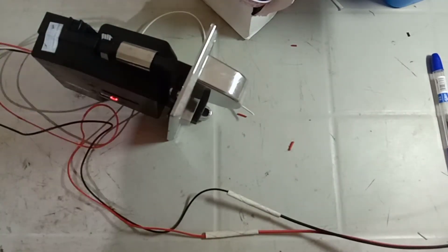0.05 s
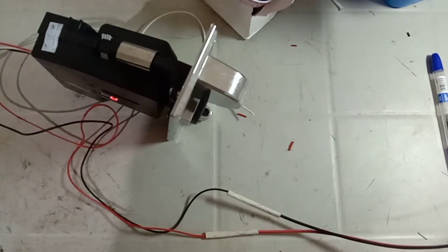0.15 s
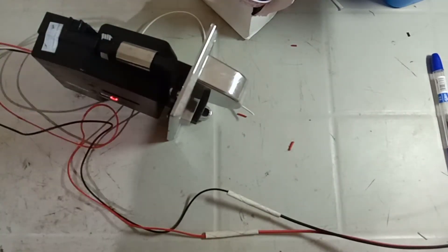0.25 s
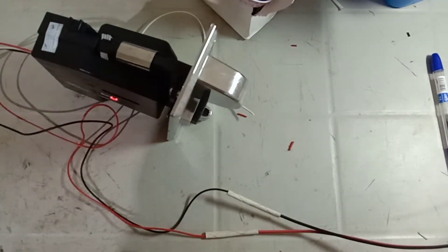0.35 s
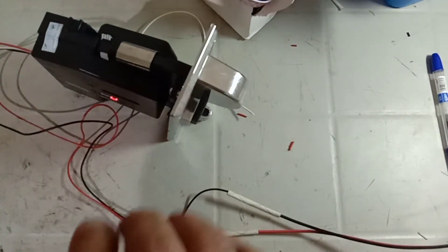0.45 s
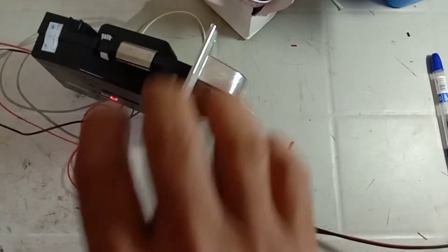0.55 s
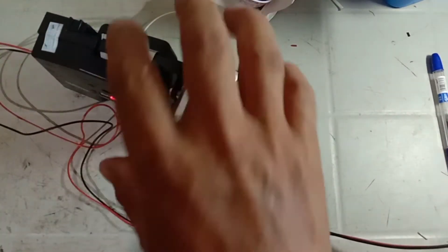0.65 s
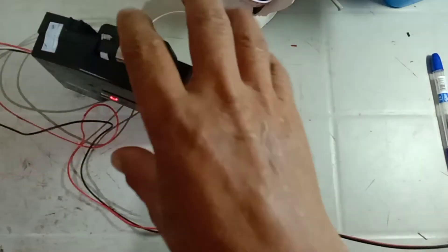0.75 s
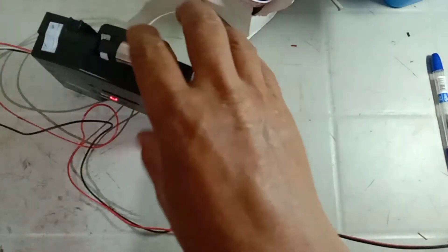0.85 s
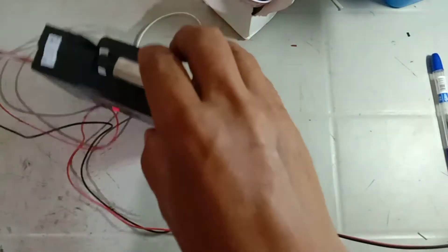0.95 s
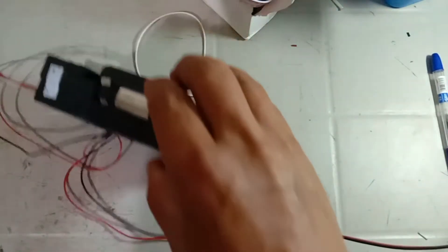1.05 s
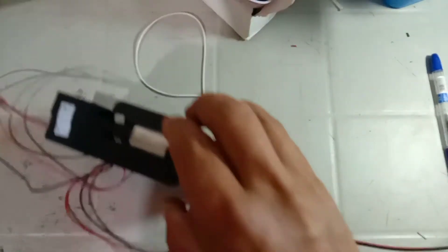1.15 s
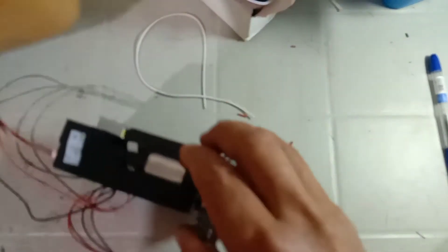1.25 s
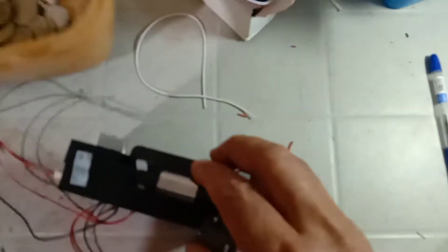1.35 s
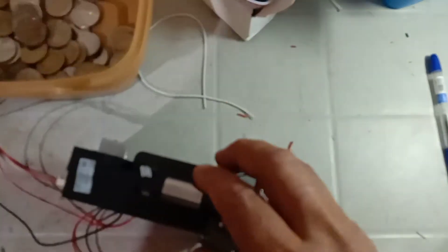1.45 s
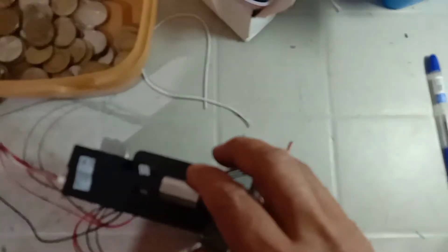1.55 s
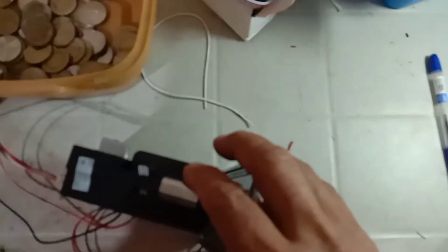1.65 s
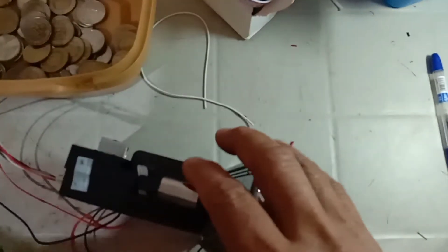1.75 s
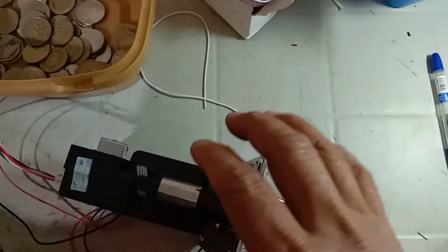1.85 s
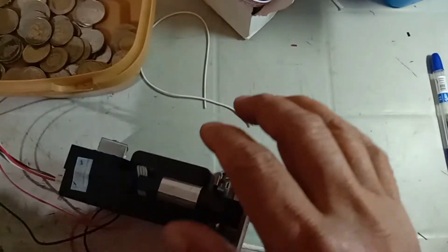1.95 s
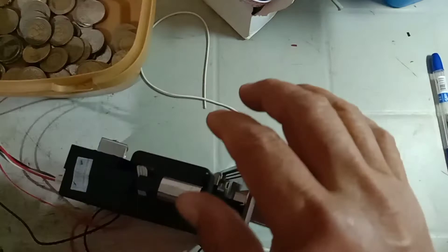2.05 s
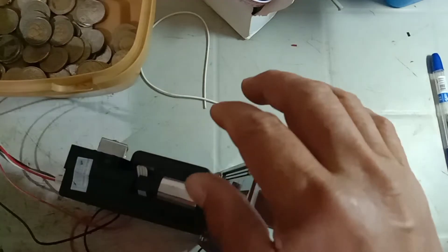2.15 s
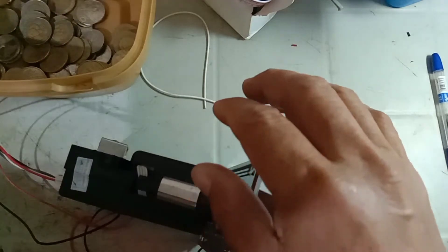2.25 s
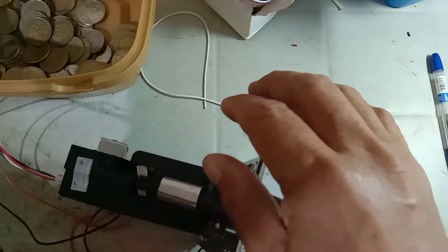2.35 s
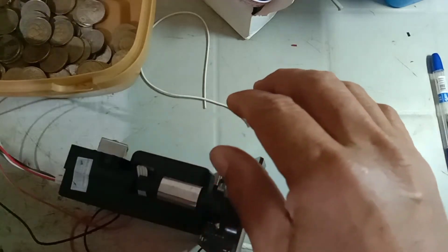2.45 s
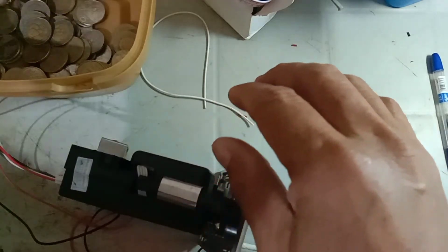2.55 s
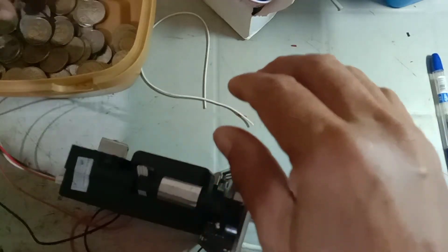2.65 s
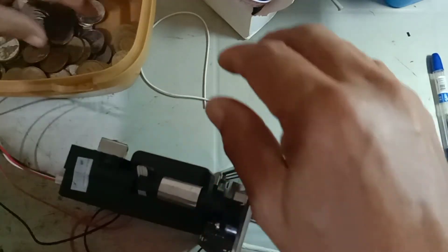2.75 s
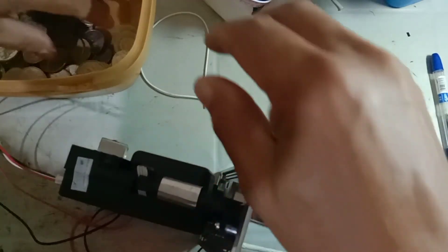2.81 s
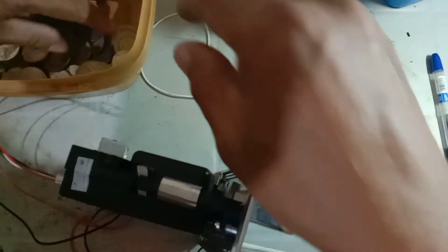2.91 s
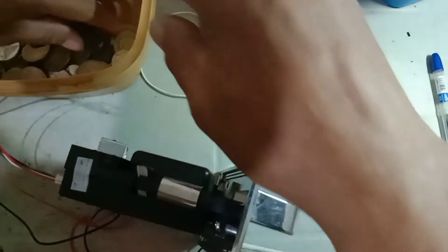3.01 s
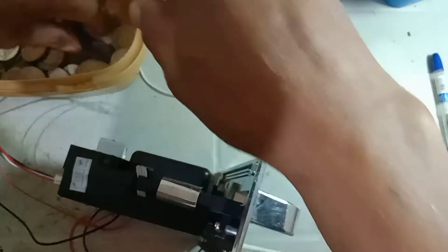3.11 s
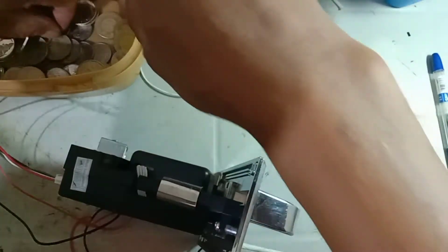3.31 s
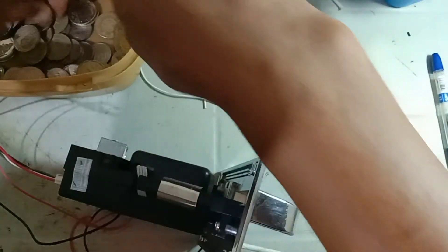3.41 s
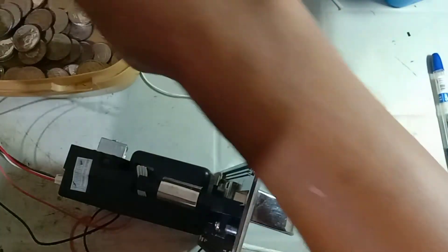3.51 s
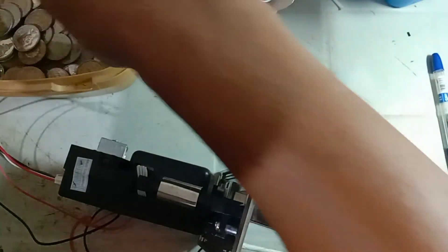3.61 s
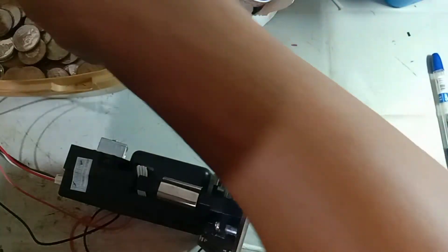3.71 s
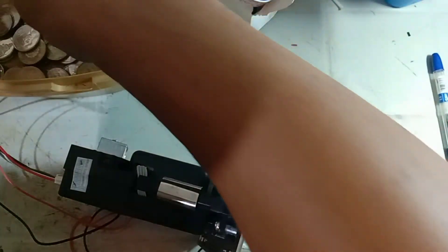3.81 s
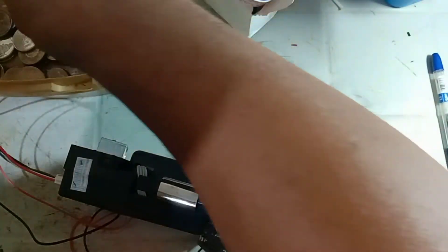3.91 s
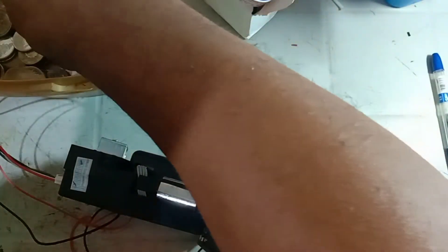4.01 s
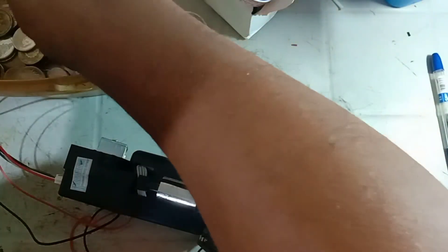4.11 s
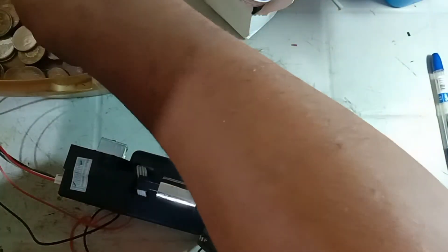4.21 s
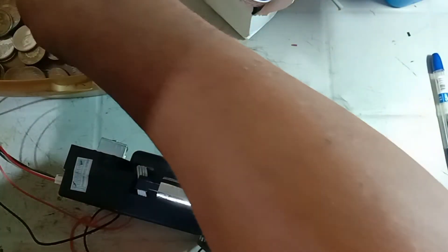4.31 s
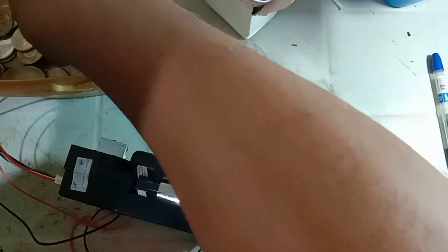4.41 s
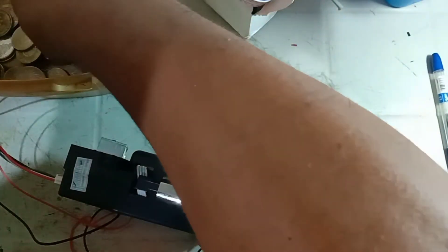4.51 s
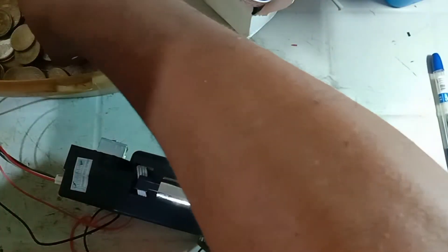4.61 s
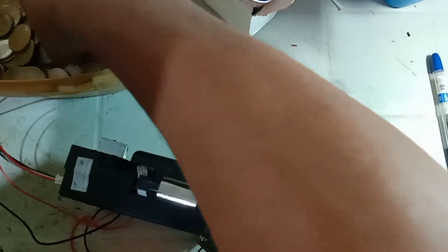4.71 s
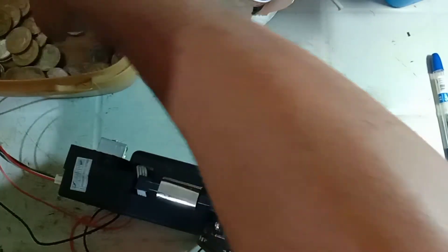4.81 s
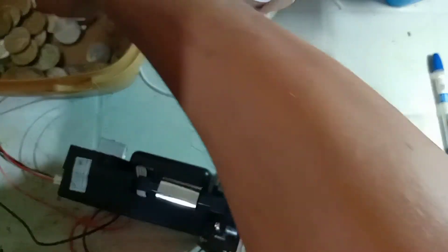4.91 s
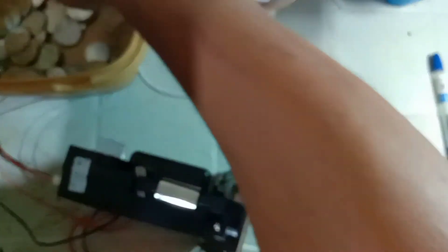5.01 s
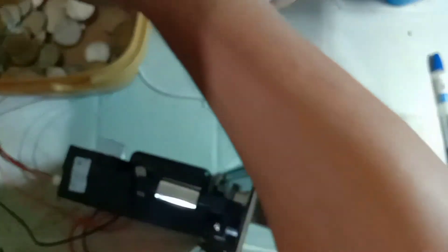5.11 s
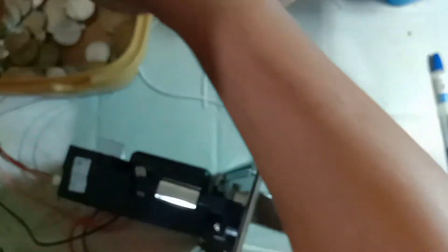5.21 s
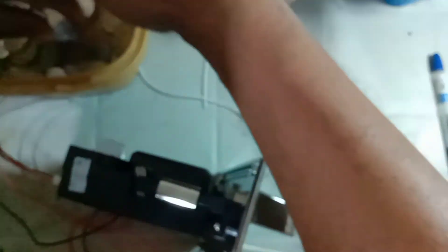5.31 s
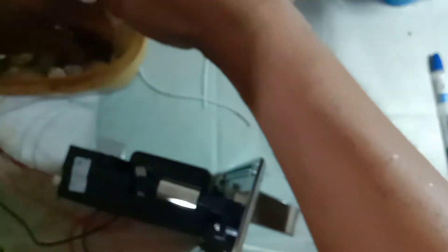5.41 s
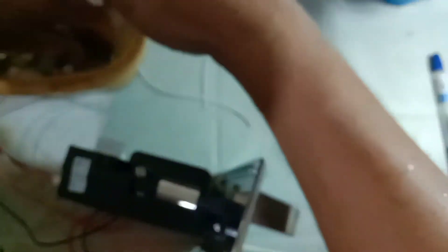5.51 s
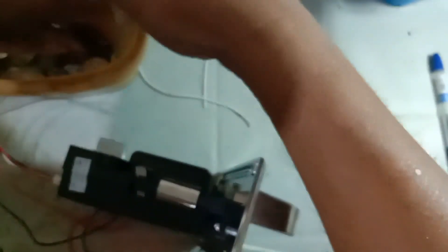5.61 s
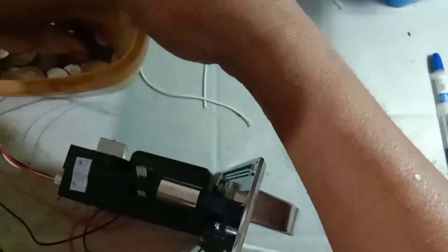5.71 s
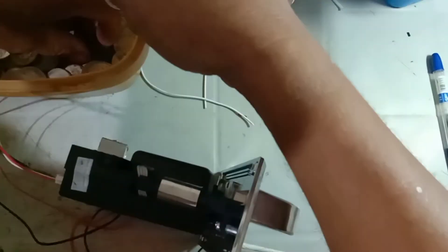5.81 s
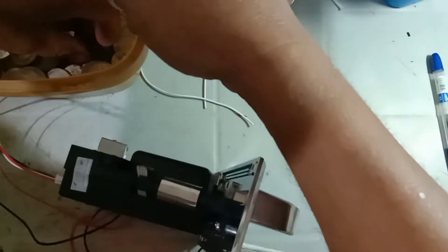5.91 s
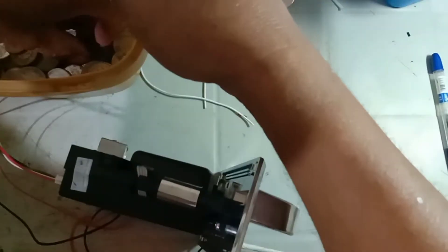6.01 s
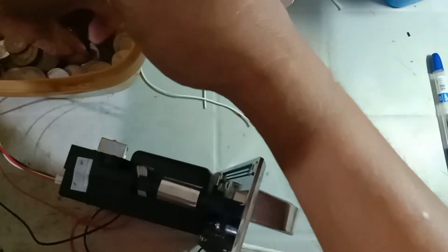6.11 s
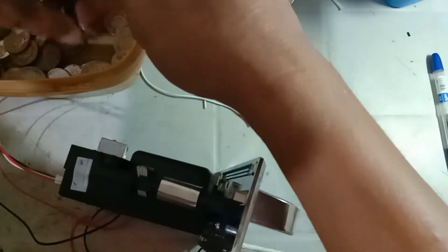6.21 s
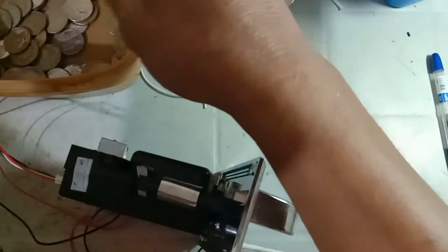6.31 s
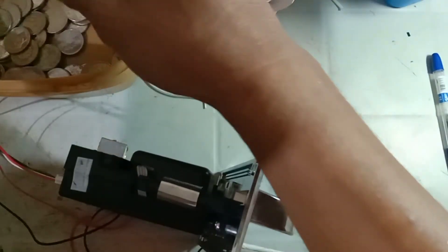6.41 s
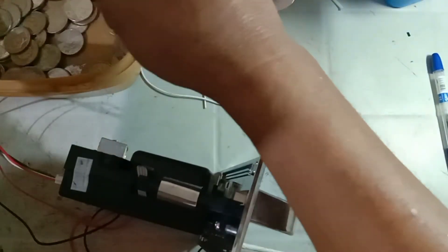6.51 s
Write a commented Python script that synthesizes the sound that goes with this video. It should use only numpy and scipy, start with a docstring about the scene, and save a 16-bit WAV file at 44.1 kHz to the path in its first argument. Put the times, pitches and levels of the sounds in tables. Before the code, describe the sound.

Near-quiet with faint hiss and tiny ticks, then a gritty scrape and hollow table thuds. A tub full of coins is put down hard, clattering, then rattles lightly as it settles. Coins are then shoved about: a loud dense crash first, followed by shorter clinking flurries, some with very high bright rings. Close phone microphone, small room with short reflections, and a low rumble swelling late.

```python
"""Rummaging in a tub of coins

A coin acceptor scrapes over a table: uneven noise and bumps excite the table and its plastic case.
A plastic tub of coins is set down and rocks to rest in softening taps; then a hand rummages in it.
Each shove opens with a hard contact and sets coins sliding until they settle. Every contact cracks through
the pile as a noise burst, knocks the tub's resonances and rings damped sines for the coins.
A small room answers, over a faint hiss and a low rumble that swells and fades."""
import sys
import numpy as np
from scipy import signal
from scipy.fft import rfft, irfft
from scipy.io import wavfile

SR = 44100
rng = np.random.default_rng(int(sys.argv[2]) if len(sys.argv) > 2 else 0)


def master(y):
    """Save y as 16-bit WAV."""
    cut = np.clip(np.atleast_2d(y).T, -1, 1)
    pcm = np.round(cut * 32767)  # scale
    wavfile.write(sys.argv[1], SR, pcm.astype(np.int16))


N = 288855
TIME = np.arange(N) / SR
SHORT = TIME[:SR // 16]  # time axis of one contact


def undb(db):
    """Decibels to gain."""
    return 10 ** (np.asarray(db) / 20)


def unit(x):
    """Scale to an energy of one."""
    return x / np.sqrt(np.sum(x ** 2))


def add(track, s, x):
    """Mix x into the track at s seconds."""
    i = int(s * SR)
    part = track[i:i + len(x)]
    part += x[:len(part)]


def fade(t, t60):
    """Exponential decay that loses 60 dB in t60 seconds."""
    return np.exp(-np.log(1000) * t / t60)


def curves(table):
    """The columns of a table, joined by straight lines in time."""
    s, *columns = np.transpose(table)
    return [np.interp(TIME, s, c) for c in columns]


def through(x, response):
    """Play x through an impulse response."""
    return signal.fftconvolve(x, response)[:N]


def highpass(x, order, hz):
    """Cut the bass below hz."""
    return signal.sosfilt(signal.butter(order, hz, "high", fs=SR, output="sos"), x)


def colour(points, size=2048):
    """Causal response with the given spectrum, by folding its cepstrum."""
    hz, db = np.transpose(points)
    f = np.maximum(np.fft.rfftfreq(size, 1 / SR), 1)
    level_db = np.interp(np.log(f), np.log(hz), db)
    cepstrum = irfft(np.log(undb(level_db)))
    cepstrum[1:size // 2] *= 2
    cepstrum[size // 2 + 1:] = 0
    return unit(irfft(np.exp(rfft(cepstrum))))


def body(modes):
    """Response of a body: one damped sine for each resonance; wider ones die sooner."""
    t = TIME[:SR // 4]
    response = np.zeros(len(t))
    for k, (hz, width, db) in enumerate(modes):
        mode = np.exp(-np.pi * width * t) * np.sin(2 * np.pi * hz * t)
        response += (-1) ** k * undb(db) * unit(mode)  # neighbours in opposite polarity
    return unit(response)


def blow(shape, db):
    """Give a shape the energy of 10 ms of sound at this level."""
    return unit(shape) * undb(db) * np.sqrt(SR / 100)


def chatter(t60, swell_s=0.0034):
    """Hard faces meet in a quick run of micro-contacts that swells and dies."""
    return rng.standard_normal(len(SHORT)) * fade(SHORT, t60) * (1 - np.exp(-SHORT / swell_s))


def uneven(spread_db, size):
    """A gain that jumps to a new random level every `size` samples."""
    steps = np.minimum(rng.standard_normal(N // size + 1), 1)
    return undb(spread_db * (np.repeat(steps, size)[:N] - .5))


def sine_rings(table):
    """Each row of (s, Hz, dB, t60) rings on in one clear mode."""
    out, t = np.zeros(N), TIME[:SR // 2]
    for s, hz, db, t60 in table:
        add(out, s, undb(db) * np.sin(2 * np.pi * hz * t) * fade(t, t60))
    return out


def room(x, t60=0.21, treble_t60=0.11, split_hz=4000, lowest_hz=220, wet_db=-6.0, dry_db=-2, first_s=0.0018):
    """Close walls answer after a few milliseconds; the treble dies first and the bass stays direct."""
    t = TIME[:SR * 3 // 4]
    echoes = highpass(rng.standard_normal(len(t)) * (t > first_s), 2, lowest_hz)
    low = signal.sosfiltfilt(signal.butter(2, split_hz, fs=SR, output="sos"), echoes)
    tail = unit(low * fade(t, t60) + (echoes - low) * fade(t, treble_t60))
    return undb(dry_db) * (x + undb(wet_db) * through(x, tail))  # dry_db trims direct sound and echoes


# spectrum of the faint background hiss: (frequency [Hz], relative level [dB])
HISS_SPECTRUM = [(30, -5), (58, 5.5), (100, -8.5), (400, -10), (850, -12.5), (1060, -8), (1270, -3.5),
                 (1500, -16.5), (2800, -23.5), (4600, -31.5), (7600, -22), (8400, -40.5), (15200, -44)]
# low rumble that swells and fades: (time [s], level [dB])
RUMBLE_LEVEL = [(0, -79.5), (3.8, -78.5), (5.2, -62.5), (5.9, -61.5), (6.5, -65)]


def background(hiss_db=-67, rumble_hz=85, rumble_width_hz=55):
    """Steady faint hiss, noise in a fixed colour, over noise in a low band."""
    hiss = through(rng.standard_normal(N), colour(HISS_SPECTRUM)) * undb(hiss_db)
    band = body([(rumble_hz, rumble_width_hz, 0)])
    steeper_band = unit(signal.fftconvolve(band, band))
    rumble = through(rng.standard_normal(N), steeper_band)
    return hiss + rumble * undb(curves(RUMBLE_LEVEL)[0])


# pulls of the acceptor over the table: (time [s], hold [s], rumble drive [dB], scrape drive [dB])
ACCEPTOR_PULLS = [(0.48, 0.41, -62, -70), (0.997, 0.12, -44, -52), (1.181, .16, -46, -47.5)]
PULL_RISE_DB_PER_S, PULL_FALL_DB_PER_S = 300, 152.5


def pulls():
    """Gains of rumble and scrape: each pull gathers speed, holds and runs out."""
    rumble, scrape = np.zeros((2, N))
    for s, hold_s, rumble_db, scrape_db in ACCEPTOR_PULLS:
        before_s = np.maximum(s - TIME, 0)
        after_s = np.maximum(TIME - s - hold_s, 0)
        speed = undb(-PULL_RISE_DB_PER_S * before_s - PULL_FALL_DB_PER_S * after_s)
        rumble += speed * undb(rumble_db)
        scrape += speed * undb(scrape_db)
    return rumble, scrape


# bumps on the table: (time [s], thump drive [dB], clack drive [dB])
TABLE_BUMPS = [(1.107, -27, -38), (1.163, -28.5, -44.5), (1.18, -32.5, -43.5), (1.211, -38.5, -48),
               (1.346, -30.5, -32), (1.493, -21.5, -28), (1.503, -32, -43.5)]
# resonances of the table top: (frequency [Hz], width [Hz], relative level [dB])
TABLE_MODES = [(123, 24, 3), (164.5, 25, -4), (250, 26, -14)]
# resonances of the acceptor's case: (frequency [Hz], width [Hz], relative level [dB])
CASE_MODES = [(314, 87, 0), (560, 150, -0.5), (655, 80, -1), (1280, 150, -2.5), (1393, 59, -8.5)]
# spectrum of plastic scraping the table: (frequency [Hz], relative level [dB])
SCRAPE_SPECTRUM = [(100, -6), (550, -1.5), (900, -1.5), (1350, 0.5), (2500, -11), (6000, -15.5),
                   (15000, -37)]


def table_top(clack_t60=0.017, loose_db=-6, grip_db=5.5, case_db=-4, scrape_db=-2.0,
              scratch_db=-4, scratch_scatter_db=8, count=260):
    """Plastic sticks and slips over the table, grit scratches under it, and bumps set the top booming."""
    rumble, scrape = pulls()
    grip = uneven(grip_db, size=150) * uneven(grip_db / 2, size=900)
    friction = grip * rng.standard_normal(N)
    grit = np.zeros(N)
    for when, size in rng.random((count, 2)):
        add(grit, when * TIME[-1], blow(np.ones(1), scratch_db + scratch_scatter_db * (size - .5)))
    rubbing = (friction + grit) * scrape
    push, clack = friction * rumble, rubbing * undb(case_db)
    for s, thump_db, clack_db in TABLE_BUMPS:
        add(push, s, blow(np.ones(1), thump_db))
        # one solid knock on the case, then its loose parts buzz
        add(clack, s, blow(np.ones(1), clack_db))
        add(clack, s, blow(chatter(clack_t60), clack_db + loose_db))
    boom = through(push, body(TABLE_MODES))
    case = through(clack, body(CASE_MODES))
    return boom + case + through(rubbing * undb(scrape_db), colour(SCRAPE_SPECTRUM))


ROCK_START_S, ROCK_PERIOD_S, ROCK_SHRINK = 1.789, .0625, .02  # shrink: part of the period lost each swing
ROCK_DB, ROCK_FALL_DB = -50.5, 6  # drive of the first tap; loss each time the number of swings doubles


def rocks(heel_s=0.0063, heel_db=-3, count=10):
    """The set-down tub rocks to rest, each swing shorter and softer; after the first, heel taps before rim."""
    swing = np.arange(count)
    periods = ROCK_PERIOD_S * (1 - ROCK_SHRINK) ** swing
    s = ROCK_START_S + np.cumsum(periods) - periods
    db = ROCK_DB - ROCK_FALL_DB * np.log2(swing + 1)
    return [*zip(s, db), *zip(s[1:] - heel_s, db[1:] + heel_db)]


# small ticks of the acceptor, its wires and the tub: (time [s], drive [dB], pitch [Hz])
LOOSE_TICKS = [(0.177, -63.5, 3100), (0.449, -56.5, 2720), (0.914, -49, 2390), (1.051, -56, 1670),
               (2.404, -71.5, 3470), (5.949, -50, 3150), (6.06, -57.5, 3050)]
# resonances of the rocking tub: (frequency [Hz], width [Hz], relative level [dB])
RATTLE_MODES = [(1220, 1350, 0), (1826, 130, 4.5), (3740, 580, 4), (5660, 500, 0), (7500, 730, -2.5)]


def rattles(rock_t60=0.03, tick_t60=0.12, tick_swell_s=0.0037, tick_width_hz=350):
    """Light taps of the rocking tub and small ticks, each a noise burst through resonances."""
    taps, ticks = np.zeros((2, N))
    for s, db in rocks():
        add(taps, s, blow(chatter(rock_t60), db))
    for s, db, hz in LOOSE_TICKS:
        tick = blow(chatter(tick_t60, tick_swell_s), db)
        add(ticks, s, through(tick, body([(hz, tick_width_hz, 0)])))
    return through(taps, body(RATTLE_MODES)) + ticks


# hard blows set the tub floor ringing: (time [s], pitch [Hz], level [dB], t60 [s])
FLOOR_BOOMS = [(1.492, 6900, -23, 0.012), (3.249, 1222, -22, 0.28), (3.249, 1600, -31.5, 0.13),
               (3.282, 1230, -29.5, 0.16), (3.241, 1950, -17, .08), (4.432, 1308, -36.5, 0.12)]


def tub_floor():
    """A patch of tub floor that is barely held rings on in one clear mode."""
    return sine_rings(FLOOR_BOOMS)


# coins that come free and ring on: (time [s], pitch [Hz], level [dB], t60 [s])
FREE_CLINKS = [(3.446, 11900, -40, 0.15), (4.344, 8210, -27.5, 0.036), (4.895, 15200, -35, 0.26),
               (4.943, 15100, -35, .2), (5.644, 14100, -24, 0.15), (5.683, 15300, -20, 0.099),
               (5.948, 8000, -52, 0.11)]


def free_coins():
    """A coin that is barely held rings on in one clear mode."""
    return sine_rings(FREE_CLINKS)


# ring of the coins in the pile: (frequency [Hz], spread from coin to coin [Hz], relative level [dB])
COIN_MODES = [(8300, 1300, -6), (12100, 600, -20), (13560, 510, -9.5), (15460, 460, -1), (14600, 78, -1)]


def coin(shortest_s=.01, longest_s=.055):
    """One coin's ring; its size sets the pitches and its neighbours the damping."""
    hz, spread, db = np.transpose(COIN_MODES)[:, :, None]
    hz = hz + spread * rng.standard_normal(hz.shape)
    modes = (undb(db) * np.sin(np.float32(2 * np.pi * hz * SHORT))).sum(0)
    t60 = shortest_s + (longest_s - shortest_s) * rng.random()
    return modes * (1 - np.exp(-SHORT * 1000)) * fade(SHORT, t60)  # 1 ms onset


def pressed_coin(low_hz=1900, high_hz=9500, t60=0.058, skew=1.6, count=3):
    """Coins pressed together ring only briefly, at pitches that change with every contact."""
    t = SHORT[:len(SHORT) // 2]
    hz = low_hz + (high_hz - low_hz) * rng.random((count, 1)) ** skew  # skew favours low pitches
    return np.sin(np.float32(2 * np.pi * hz * t)).sum(0) * fade(t, t60) * (1 - np.exp(-t * 1000))


# a jolt or a push of the fingers sets coins sliding: (time [s], drive [dB], rise [s], hold [s],
# settling [dB/s], tub knock relative to drive [dB], coin ring relative to drive [dB])
HAND_SHOVES = [(1.489, -29.5, .002, 0.072, 125, -4, -2), (2.832, -51.5, .004, .06, 174, -7, -9),
               (2.903, -34, 0.017, 0.028, 121, -6.5, -6), (3.055, -46, 0.0011, 0.023, 171.5, -5, -7),
               (3.101, -41.5, .002, 0.0081, 168.5, -3.5, 2.5), (3.143, -29.5, .002, .04, 141, 0.5, -5.5),
               (3.244, -30, .002, .07, 190.5, -2.5, -1.5), (3.449, -43, 0.011, 0.023, 250.5, -2.5, 12),
               (3.972, -47, 0.0087, 0.021, 197.5, -8, -5), (3.995, -37, 0.015, 0.029, 219, -5.5, 1.5),
               (4.108, -40, 0.0082, 0.037, 171, -4.5, -1), (4.149, -30, 0.025, 0.025, 131, -4.5, 2.5),
               (4.255, -40, .004, 0.042, 100.5, -2.5, -16), (4.421, -46, .004, 0.026, 169, -2, -11),
               (4.617, -54, 0.0011, 0.0023, 190.5, -5, -31), (4.75, -38.5, 0.022, .035, 129.5, -4.5, 0.5),
               (4.826, -36.5, .01, .01, 169, -6.5, 7), (4.894, -37, 0.0023, .07, 230, -1.5, 5.5),
               (5.164, -59.5, 0.0051, 0.0059, 140.5, 0, -26), (5.393, -41, 0.011, .01, 109.5, -2, -2.5),
               (5.453, -38, .014, 0.036, 200, -3.5, -7.5), (5.551, -45.5, 0.0035, 0.021, 152.5, -4, -12),
               (5.616, -36, 0.0018, .075, 180, -5.5, 5), (6.117, -48.5, 0.0083, 0.027, 153, -6, 0),
               (6.179, -40, .008, 0.022, 230.5, -3.5, -2)]


def slips(scatter_db=9, size_db=-7.5, start_db=-12, settled_db=29, thinning=1.25, packing=0.42, count=44):
    """Small contacts build up to each shove, hold, then thin out and ring less as the coins pack."""
    rows = []
    for s, db, rise_s, hold_s, settle, tub_rel, ring_rel in HAND_SHOVES:
        when, size = rng.random((count, 2)).T
        end_s = hold_s + settled_db / settle
        progress = (np.arange(count) + when) / count
        age = (rise_s + end_s) * progress ** thinning - rise_s
        effort_db = np.interp(age, [-rise_s, 0, hold_s, end_s], [start_db, 0, 0, -settled_db])
        levels = db + effort_db + size_db + scatter_db * size ** 2
        rows += zip(s + age, levels, np.full(count, tub_rel), ring_rel + packing * effort_db)
    return rows


# single coins that drop hard within a shove: (time [s], drive [dB], tub knock relative to drive [dB])
COIN_CLASHES = [(1.4919, -21.5, -4.5), (1.538, -41, 7.5), (1.63, -37.5, -6), (2.994, -42.5, 3.5),
                (3.163, -26, -1.5), (3.174, -25.5, 5), (3.185, -23.5, -13), (3.212, -20, -5.5),
                (3.241, -20, -5), (3.249, -24.5, 5), (3.311, -30, -32), (3.422, -41, -12),
                (3.469, -37.5, -1), (4.016, -36, -7), (4.173, -22.5, -6), (4.201, -36, -19.5),
                (4.28, -39, 6), (4.343, -35, -29), (4.393, -39.5, -8), (4.711, -45.5, -7.5),
                (4.737, -43.5, -9.5), (4.833, -28, 1), (4.906, -29, 2.5), (4.941, -29.5, 1.5),
                (5.472, -31, -1.5), (5.618, -25.5, -7.5), (5.644, -29.5, -9), (5.67, -29.5, -5.5),
                (6.201, -32, -12)]
LEAD_DB, LEAD_SOFTER_DB_PER_S = 5.5, 247.5  # opening contact above the sliding, less so after a slow rise
FULL_RING_DB = -27.5  # dropped coins driven harder than this ring no louder


def strikes(lead_ring_db=-4, ring_db=-1):
    """Hard contacts: one opens each shove, others drop later and ring like the coins of that shove."""
    rows = []
    for s, db, rise_s, _, _, tub_rel, ring_rel in HAND_SHOVES:
        lead_db = db + LEAD_DB - LEAD_SOFTER_DB_PER_S * rise_s
        rows.append((s, lead_db, tub_rel, ring_rel + lead_ring_db))
    starts = [row[0] for row in HAND_SHOVES]
    for s, db, tub_rel in COIN_CLASHES:
        ring_rel = HAND_SHOVES[np.searchsorted(starts, s) - 1][-1]
        rows.append((s, db, tub_rel, ring_rel + ring_db - max(db - FULL_RING_DB, 0)))
    return rows


def scuffs(lead_s=0.0063, size_db=-17):
    """A coin scuffs its neighbours just before it drops and strikes."""
    return np.array(strikes()) + [-lead_s, size_db, 0, 0]


# spectrum of a contact cracking through the pile: (frequency [Hz], relative level [dB])
CRACK_SPECTRUM = [(100, -2), (250, -5.5), (600, -10), (950, -1.5), (1400, -3.5), (3000, 3), (4000, 1),
                  (5000, 0.5), (7200, 1.5), (8800, -4), (10000, -7.5), (11500, -11), (13500, -19.5),
                  (15500, -12)]
# resonances of the tub wall: (frequency [Hz], width [Hz], relative level [dB])
TUB_MODES = [(256, 60, -26), (475, 110, -15.5), (710, 120, -12.5), (1240, 83, 2.5), (1346, 78, 0.5),
             (1518, 87, -1), (1980, 230, -1), (2330, 140, -9), (2657, 110, -9.5), (2810, 60, -11.5),
             (3180, 440, -9), (3714, 53, -8)]
# the hollow under the cupped hand: (time [s], level relative to the crack [dB])
CUP_LEVEL = [(5.0, -28.5), (5.55, -4)]


def rummage(crack_t60=.024, knock_t60=0.025, crack_db=-2.5, pressed_db=-7.5, tub_db=-1, ring_db=0,
            thump_db=-29, thump_growth=0.63, lean=0.41, thud_db=-9, cup_hz=3100, cup_width_hz=600):
    """Every contact cracks in the pile, knocks the tub and the table under it, and rings coins."""
    crack, knock, thump, pressed, ring = np.zeros((5, N))
    for s, db, tub_rel, ring_rel in [*strikes(), *scuffs(), *slips()]:
        add(crack, s, blow(chatter(crack_t60), db + crack_db))
        push = chatter(knock_t60)
        add(knock, s, blow(push, db + tub_rel + tub_db))
        # the heavy pile evens out the force that reaches the table
        add(thump, s, blow(push, thump_growth * db + thump_db))
        add(pressed, s, blow(pressed_coin(), db + pressed_db))
        add(ring, s, blow(coin() + coin(), db + ring_rel + ring_db))
    # later on, the thumps grow and the wall rings less and thuds more
    late_db = curves(RUMBLE_LEVEL)[0]
    weight = undb(lean * (late_db - late_db.mean()))
    wall_ring = through(knock / np.sqrt(weight), body(TUB_MODES))
    wall_thud = through(knock * weight, body(TUB_MODES[:3])) * undb(thud_db)
    hollow = through(crack * undb(curves(CUP_LEVEL)[0]), body([(cup_hz, cup_width_hz, 0)]))
    pile = through(crack, colour(CRACK_SPECTRUM))
    table = through(thump * weight, body(TABLE_MODES))
    # pile, wall, table, hand and coins each reach the room's walls by their own paths
    parts = pile, wall_ring + wall_thud, table, hollow, pressed, ring
    return sum(room(part) for part in parts)


def scene():
    """All sources, heard from one point; the clear rings and the background stay without echo."""
    echoing = room(rattles() + table_top()) + rummage()
    return (background() + echoing + tub_floor() + free_coins())[None]


def record(dry, bass_hz=58, top_hz=15520):
    """The phone cuts the deepest bass and the top."""
    thin = highpass(dry, 3, bass_hz)
    return signal.sosfilt(signal.ellip(10, .2, 70, top_hz, fs=SR, output="sos"), thin)


dry = scene()
out = record(dry)
master(out)
```